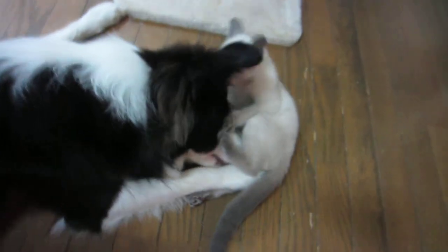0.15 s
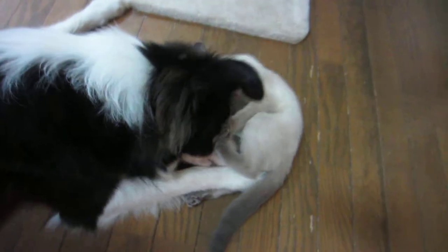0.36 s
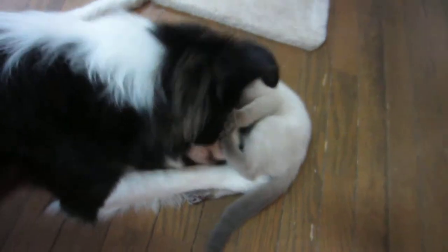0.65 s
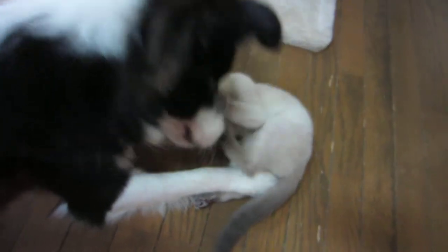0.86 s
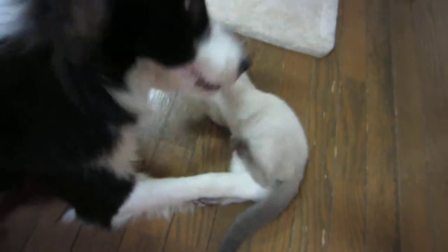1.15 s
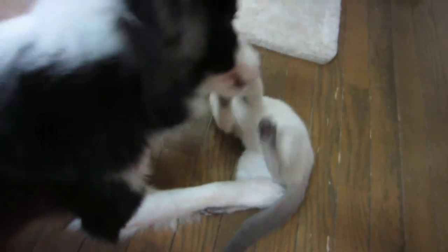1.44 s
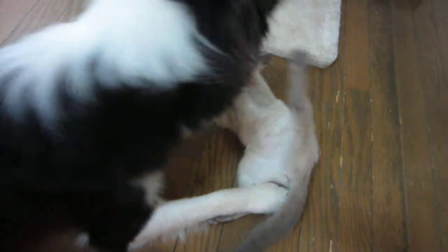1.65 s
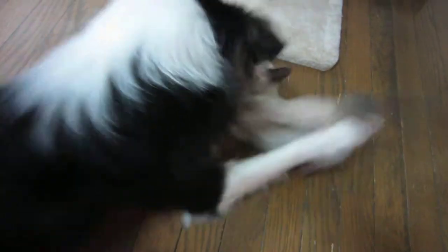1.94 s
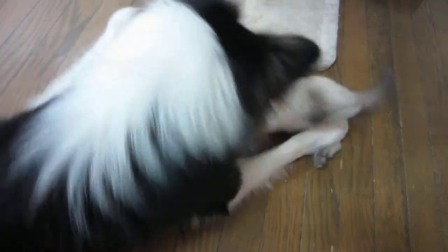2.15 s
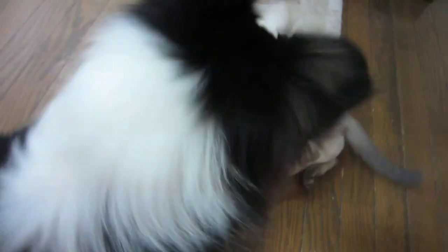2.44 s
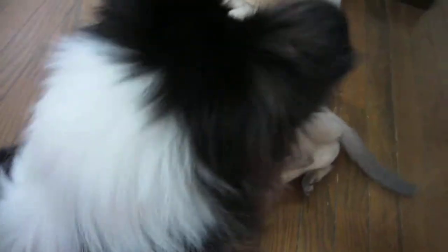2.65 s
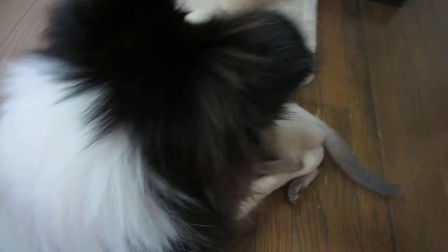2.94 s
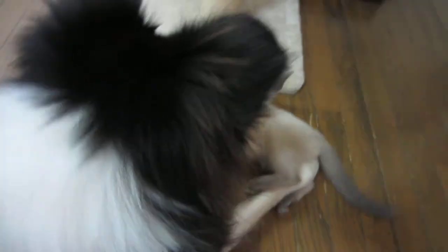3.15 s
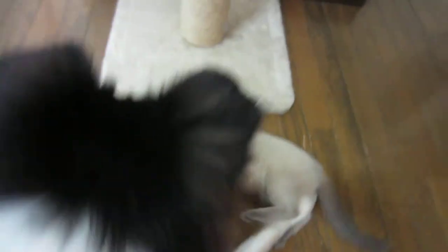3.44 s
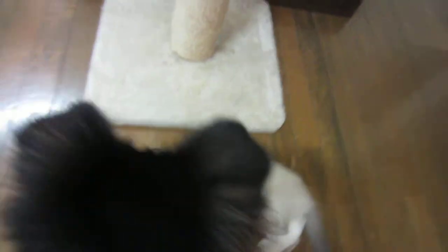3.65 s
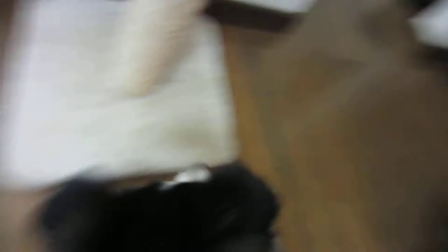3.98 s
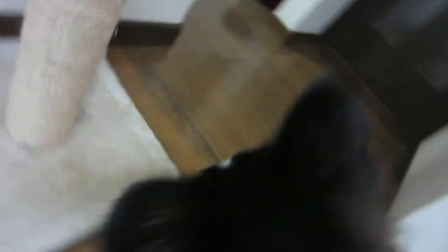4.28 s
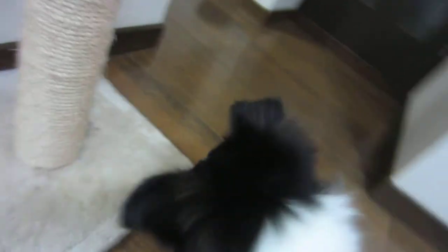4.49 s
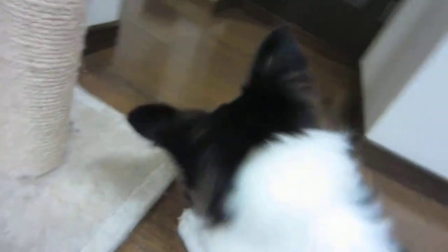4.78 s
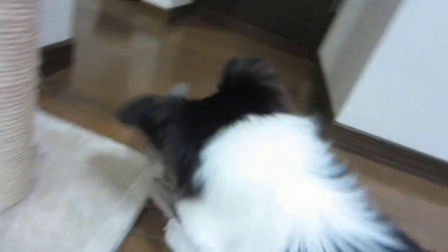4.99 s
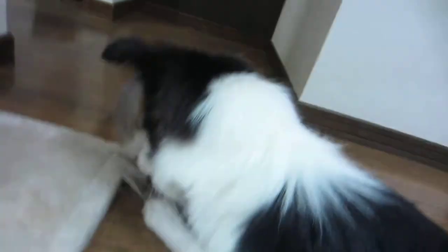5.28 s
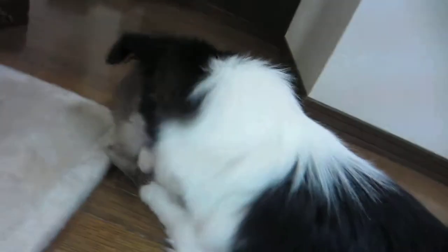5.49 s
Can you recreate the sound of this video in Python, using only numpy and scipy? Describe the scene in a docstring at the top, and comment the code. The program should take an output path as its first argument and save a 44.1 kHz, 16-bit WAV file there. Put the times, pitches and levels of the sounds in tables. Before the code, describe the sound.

Two small animals scuffle on a wooden floor indoors, with claw clicks, soft scuffs, dull pats and heavy thumps in bursts.

```python
"""A dog and a kitten wrestle on a wooden floor in a small, bare room with a quiet, steady background.
Soft scuffs, claw clicks and a faint thump come first; thumps at 1.9 s lead to the hardest at 2.5 s.
Pats follow from 3.1 s, then a juddering paw at 3.7 s and two squeals of a pad just before 4 s.
Thumps and claws crowd together from 4.2 to 4.6 s; a squeal, scuffs and a last tap close the bout.
Landings are smooth pulses with a wall echo and modes; claws, pats and strokes are shaped noise."""
import sys
import numpy as np
from scipy import signal
from scipy.fft import rfft, irfft
from scipy.io import wavfile

SR = 44100
rng = np.random.default_rng(int(sys.argv[2]) if len(sys.argv) > 2 else 0)


def put_to_file(sound):
    """Save the sound as 16-bit audio at rate SR, in the file named by the first command-line argument."""
    columns = np.atleast_2d(sound).T  # one column per channel
    safe = np.clip(columns, -1, 1)
    whole_steps = np.round(safe * 32767)
    wavfile.write(sys.argv[1], SR, whole_steps.astype(np.int16))


N = 247842
TIME = np.arange(N) / SR

# strokes of fur (broad) and pads (narrow) over the wood, reaching so far either side of the centre:
# height_s, swell_s (and fade), level_db, centre_hz, reach_octaves
STROKES = [(.98, 0.076, -57, 960, 1.04), (1.72, 0.24, -59, 1170, 1.24), (1.93, 0.17, -45, 720, 0.75),
           (2.18, 0.28, -55.5, 2360, 0.77), (2.345, 0.066, -40, 1200, 0.94),
           (2.385, 0.13, -43.5, 350, 0.42), (2.45, 0.13, -42, 1550, 0.43), (2.549, 0.093, -49, 2600, 1.44),
           (3.438, 0.015, -39, 2410, 0.27), (3.509, 0.11, -52, 2180, 0.42), (3.68, 0.022, -57, 2600, 1.2),
           (3.83, 0.17, -44, 420, 0.75), (3.985, 0.082, -41.5, 944, 0.99), (4.135, 0.047, -45.5, 950, 0.81),
           (4.33, 0.28, -50, 1300, 0.92), (4.446, 0.033, -39.5, 2620, 0.32), (4.559, 0.11, -38, 1440, 1.04),
           (4.98, 0.075, -52.5, 1460, 0.99), (5.06, 0.096, -45.5, 770, 0.78),
           (5.525, 0.076, -49.5, 1630, 0.88)]


def undb(db):
    """Level to amplitude: 20 dB is a factor of ten."""
    return 10 ** (np.asarray(db) / 20)


def unit(x):
    """Normalisation to an rms amplitude of 1."""
    return x / np.sqrt(np.mean(x ** 2))


def t60_decay(t, t60):
    """Exponential decay: the amplitude falls by 60 dB in the time t60."""
    return np.exp(-np.log(1000) * t / t60)


def along(points, hz):
    """Interpolation of (Hz, value) points on a logarithmic frequency axis."""
    f, value = np.transpose(points)
    return np.interp(np.log(hz), np.log(f), value)


def colour(x, points):
    """Linear filtering: the spectrum is multiplied by a gain curve of (Hz, dB) points."""
    n = x.shape[-1]
    hz = np.fft.rfftfreq(n, 1 / SR) + 1  # kept above zero for the logarithm
    return irfft(rfft(x) * undb(along(points, hz)), n)


def band(x, hz, octaves, order=1):
    """Resonance as a causal band-pass, reaching so many octaves either side of its centre."""
    reach = 2 ** max(abs(octaves), .03)
    edges = [min(hz / reach, .3 * SR), min(hz * reach, .45 * SR)]
    b, a = signal.butter(order, edges, "bandpass", fs=SR)
    return signal.lfilter(b, a, x)


def add(track, s, sound):
    """Superposition: mix a sound into a track from time s on."""
    start = int(round(s * SR))
    lo, hi = max(start, 0), min(start + len(sound), N)
    track[lo:hi] += sound[lo - start:hi - start]


def convolve(x, response):
    """Linear response: each sample of the track excites the impulse response."""
    return signal.fftconvolve(x, response)[:N]


def diffuse(n, spread):
    """Partial coherence: two channels share a mid noise and take a side noise in opposite phase."""
    mid, side = rng.standard_normal((2, n))
    side = colour(side, spread)
    return np.array([mid + side, mid - side])


def house(level_db=-55.5):
    """Stationary noise: the quiet, steady rush of the house has a fixed spectrum."""
    # spectral density of the rush, relative: freq_hz, density_db (per Hz)
    house_spectrum = [(25, -11), (60, 0), (95, 4), (150, 0), (210, 1), (330, 4.5), (480, -1.5), (800, -3.5),
                      (1500, -10), (2500, -15), (4200, -23), (8000, -25), (10000, -33), (12000, -46),
                      (14000, -36)]
    # unlikeness of the two channels: freq_hz, side_minus_mid_db
    house_spread = [(60, 4), (200, 2.5), (1300, 4), (4400, 1.5), (15000, -1.5)]
    rush = colour(diffuse(N, house_spread), house_spectrum)
    return undb(level_db) * rush / np.std(rush.mean(axis=0))


def room(x, build_s=0.003):
    """Diffuse reverberation: it builds up over the first reflections, then each band dies at its own rate."""
    # reverberation time of the room: freq_hz, t60_s
    room_t60 = [(80, 0.79), (300, 0.91), (1000, 0.83), (2500, 0.61), (6000, 0.51), (14000, 0.1)]
    # unlikeness of the two channels: freq_hz, side_minus_mid_db
    room_spread = [(40, -20), (110, -0.5), (330, -18.5), (700, -19), (2400, -7.5), (6000, -2), (12000, -1)]
    t = TIME[:SR]
    hz = np.arange(SR // 2 + 1) + 1
    spectrum = rfft(diffuse(SR, room_spread))
    centres, t60s = np.transpose(room_t60)
    tail = 0
    for t60, pick in zip(t60s, np.eye(len(centres))):
        share = np.interp(np.log(hz), np.log(centres), pick)  # overlapping bands that sum to 1
        tail = tail + irfft(spectrum * share, SR) * t60_decay(t, t60)
    tail = tail * (1 - np.exp(-(t / build_s) ** 2))
    responses = unit(tail) / np.sqrt(SR)
    return np.array([convolve(x, response) for response in responses])


def stroke_hiss_db(hz, octaves, base_db=-11, ref_hz=1230, db_per_octave=5.5, db_per_reach=18):
    """Spectral tilt of friction: higher and broader strokes hiss more."""
    return base_db + db_per_octave * np.log2(hz / ref_hz) + db_per_reach * (octaves - 1)


def stroke(t, rise, fall, hz, octaves, grains_hz=1500, grain_db=4.0, catch_db=3.5, catch_hz=110,
           hiss_hz=6000, skirt_db=-15):
    """Friction: hairs and pads catch and let go in dense tiny slips as the pressure swells and fades."""
    size, grip, hairs = rng.standard_normal((3, len(t)))
    slipping = rng.random(len(t)) < grains_hz / SR
    slips = slipping * np.sign(hairs) * undb(grain_db * size)
    # the grip wanders irregularly
    catch = undb(catch_db * np.interp((t - t[0]) * catch_hz, np.arange(len(t)), grip))
    core = unit(band(slips, hz, octaves, order=2))
    skirt = unit(band(slips, hz, octaves))  # gentler slopes below and above
    rub = core + undb(skirt_db) * skirt
    hiss = undb(stroke_hiss_db(hz, octaves)) * unit(band(hairs, hiss_hz, 0.97))
    pressure = np.exp(-(t / np.where(t < 0, rise, fall)) ** 2)
    return unit(pressure * catch * (unit(rub) + hiss)) * np.sqrt(np.mean(pressure ** 2))


def scuffs(near_db=-2, room_db=-5, squeal_room_db=-13):
    """Sliding friction: scuffs swell and fade evenly; squeals are narrow bands that rise fast."""
    # a pad squealing on the varnish: height_s, level_db, pitch_hz
    squeal_rows = [(3.968, -35, 1494), (3.999, -35.5, 1480), (4.955, -45, 1050)]
    rise_s, fall_s, squeal_octaves = 0.011, 0.03, .11
    rubs, squeals = np.zeros(N), np.zeros(N)
    t = np.arange(-SR // 2, SR // 2) / SR  # zero at the height of the stroke
    for s, swell_s, db, hz, octaves in STROKES:
        add(rubs, s + t[0], undb(db) * stroke(t, swell_s, swell_s, hz, octaves))
    for s, db, hz in squeal_rows:
        add(squeals, s + t[0], undb(db) * stroke(t, rise_s, fall_s, hz, squeal_octaves))
    near = undb(near_db) * (rubs + squeals)
    return near + undb(room_db) * room(rubs + undb(squeal_room_db) * squeals)


def taps(rows, order, room_db, attack_s=0.00032):
    """Impact: a brief crack of noise, coloured by the spot that it hits and answered by the room."""
    out, t = np.zeros(N), TIME[:SR // 16]
    seating = 1 - np.exp(-t / attack_s)  # the claw or pad seats itself
    for s, db, hz, decay_ms, octaves in rows:
        decay = np.exp(-t * 1000 / decay_ms)
        burst = rng.standard_normal(len(t)) * decay * seating
        crack = unit(band(burst, hz, octaves, order=order))
        add(out, s, undb(db) * crack * np.sqrt(np.mean(decay ** 2)))
    return out + undb(room_db) * room(out)


def judder(count=6, start_s=3.735, rate_hz=34, jitter_s=0.00225, level_db=-40, scatter_db=4.0,
           centre_hz=517, decay_ms=2.2):
    """Stick-slip: a sliding paw sticks and lets go in a short run of dull knocks."""
    rows = []
    for k, (late, force) in enumerate(rng.standard_normal((count, 2))):
        s = start_s + k / rate_hz + jitter_s * late
        rows.append((s, level_db + scatter_db * force, centre_hz, decay_ms))
    return rows


def pats(reach_octaves=0.4):
    """Soft impact: yielding pads and smacking jaws give dull knocks, low in pitch."""
    # jaws smacking and pads patting: start_s, level_db, centre_hz, decay_ms
    pat_rows = [(.7000, -30.5, 910, 2.3), (1.201, -46.5, 620, 7.4), (1.437, -46.5, 740, 3.9),
                (1.922, -28, 590, 4.5), (2.020, -27.5, 600, 6.3), (2.546, -27.5, 560, 14.4),
                (3.102, -44.5, 700, 6.7), (3.123, -40, 764, 3.2), (3.161, -47, 846, 2.8),
                (3.262, -44.5, 750, 2.1), (3.333, -38, 503, 7.8), (3.440, -34, 805, 10.4),
                (4.1785, -26.5, 698, 14), (4.514, -31, 575, 17), (5.4682, -42.5, 440, 6.6)]
    rows = [(s, db, hz, ms, reach_octaves) for s, db, hz, ms in pat_rows + judder()]
    return taps(rows, order=2, room_db=-6.5)


def skitter(count=12, over_stroke_db=-7, scatter_db=2.0, centre_hz=2600, scatter_octaves=.5,
            decay_ms=0.72, above_hz=600):
    """Random grazing impacts: claws touch the wood in the brighter strokes, harder in stronger ones."""
    rows = []
    chance = rng.standard_normal((len(STROKES), count, 3))
    for (s, swell_s, db, hz, _), draws in zip(STROKES, chance):
        if hz <= above_hz:  # duller strokes are made by fur and pads alone
            continue
        for when, force, spot in draws:
            graze_s = s + swell_s * np.tanh(when)
            graze_db = db + over_stroke_db + scatter_db * force
            rows.append((graze_s, graze_db, centre_hz * 2 ** (scatter_octaves * spot), decay_ms))
    return rows


def claws(reach_octaves=0.3, ref_hz=2200, ref_ms=5.2, pitch_power=0.25, decay_power=1):
    """Hard impact: bright clicks, the broader in band the sharper and longer the strike."""
    # claws striking the wood: start_s, level_db, centre_hz, decay_ms
    claw_rows = [(0.3604, -57.5, 3100, 8.5), (0.5726, -51, 2640, 2.7), (.867, -55, 7000, 3),
                 (.9765, -46, 4500, 1.2), (1.004, -40.5, 1470, 1.9), (1.027, -45.5, 2600, 1.6),
                 (1.394, -55, 6400, 3.1), (1.497, -52.5, 3330, 6), (1.7478, -50, 7400, 4.3),
                 (1.811, -38, 1330, 7.1), (1.842, -44, 1500, 7.7), (1.922, -28.5, 2300, 2.7),
                 (1.9555, -42, 2596, 3.5), (2.019, -26, 1400, 2.8), (2.0942, -45, 4500, 3.8),
                 (2.259, -41.5, 5900, 13), (2.2744, -31.5, 2270, 2.8), (2.32, -29, 1860, 6.1),
                 (2.545, -28.5, 2080, 7.7), (3.4192, -33.5, 2300, 2.2), (3.442, -30.5, 2080, 2.2),
                 (3.656, -43.5, 1430, 2.8), (4.12, -37, 1260, 1.6), (4.2744, -48.5, 4070, 7.5),
                 (4.466, -25.5, 2700, 5.1), (4.489, -27.5, 2390, 2.6), (4.513, -21, 1760, 10.4),
                 (4.5476, -29, 1990, 21.4), (4.583, -31, 2100, 9.8), (5.4688, -36, 2040, 3.2)]
    rows = []
    for s, db, hz, ms in claw_rows + skitter():
        octaves = reach_octaves * (hz / ref_hz) ** pitch_power * (ms / ref_ms) ** decay_power
        rows.append((s, db, hz, ms, octaves))
    return taps(rows, order=1, room_db=-7)


def thumps(near_db=-10.0, boom_db=-33, board_db=-5, board_hz=240, board_s=0.0051, room_db=-11,
           wall_s=.0182, springiness=3.64):
    """Modal excitation: a landing flexes the boards, a wall returns the push and standing waves ring on."""
    # bodies landing, levels before the mix, echo and ringing relative to the landing:
    # dip_s, peak_db, pitch_hz, echo_db, ringing_db
    landings = [(0.2951, -36.5, 190, 10, 4.5), (1.8504, -22.5, 113, 8, 2.5), (2.036, -23.5, 129, 15.5, 7.5),
                (2.5414, -14.5, 165, 13.5, 1), (2.5458, -8.5, 225, 8, 5.5), (4.1813, -14.5, 254, 7, 9.5),
                (4.463, -16.5, 129, -5, 3.5), (4.492, -14, 107.8, 6, -4.5), (4.55, -12.5, 157, -14, -8.5),
                (4.582, -25, 287, 9, 8.5)]
    # standing waves of the boards and the room: freq_hz, level_db, t60_s
    standing_waves = [(44.4, -22.5, 0.36), (77.3, -31, 0.83), (95.3, -18.5, 0.36), (148.7, -16, 0.27),
                      (198.4, -18, 0.36), (212.9, -14, 0.24), (262, -20, 0.4), (284, -23, 0.59),
                      (299.5, -16, 0.55), (345, -20.5, 0.38), (399, -21, 0.21), (443, -22, 0.4),
                      (550, -46, 0.14)]
    push, drive = np.zeros(N), np.zeros(N)
    t = np.arange(-SR // 20, SR // 20) / SR
    for s, db, hz, echo_db, ring_db in landings:
        # a smooth dip and return, with a swing to either side that grows with springiness (3-8)
        pulse = np.real((1 - 2j * np.pi * hz * t / (springiness - 1)) ** -springiness)
        flex = -undb(db) * pulse
        add(push, s + t[0], flex)
        add(push, s + t[0] + wall_s, -undb(echo_db) * flex)  # the echo comes back inverted
        add(drive, s + t[0], undb(ring_db) * flex)
    t = TIME[:SR]
    # the struck board swings a few times more
    board = np.exp(-t / board_s) * np.cos(2 * np.pi * board_hz * t) / (board_s * SR / 2)
    near = push + undb(board_db) * convolve(push, board)
    modes = sum(undb(db) * t60_decay(t, t60) * np.cos(2 * np.pi * hz * t)
                for hz, db, t60 in standing_waves)
    boom = convolve(drive, modes)
    return undb(near_db) * near + undb(boom_db) * boom + undb(room_db) * room(drive)


def scene(left_db=0.85):
    """Level panning: the scuffle lies a little to the left, over the background."""
    # treble response of the microphone: freq_hz, gain_db
    treble = [(7500, -0.5), (9500, -7.5), (11000, -15), (12200, -39), (13500, -16), (15500, -16.5)]
    scuffle = colour(thumps() + claws() + pats() + scuffs(), treble)
    return scuffle * undb([[left_db], [-left_db]]) + house()


def record(dry, top_hz=15800):
    """Band limiting: a steep elliptic low-pass cuts the top of the spectrum."""
    low_pass = signal.ellip(8, .2, 70, top_hz, fs=SR, output="sos")  # ripple and stop band in dB
    return signal.sosfilt(low_pass, dry)


dry = scene()
out = record(dry)
put_to_file(out)
```